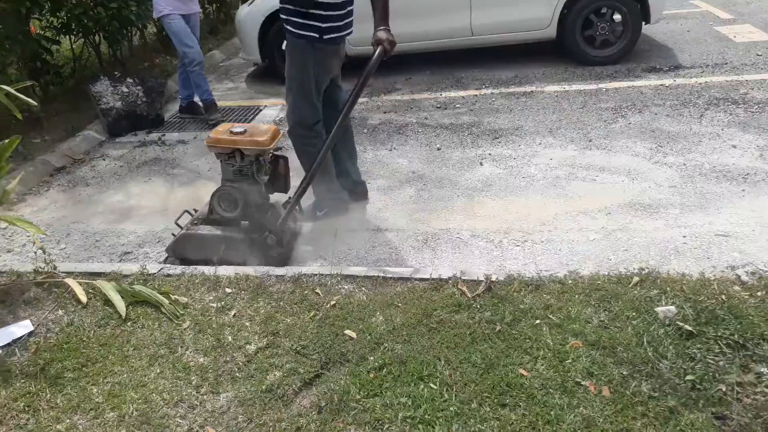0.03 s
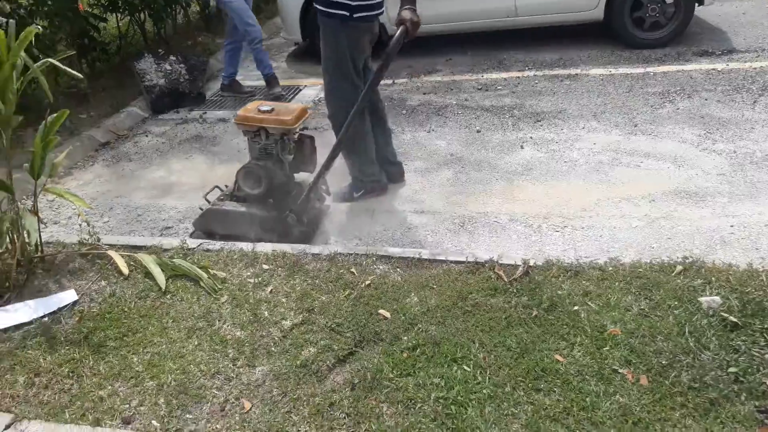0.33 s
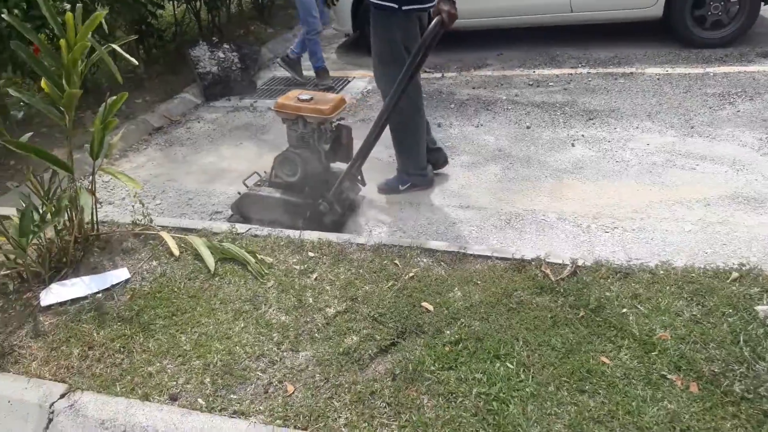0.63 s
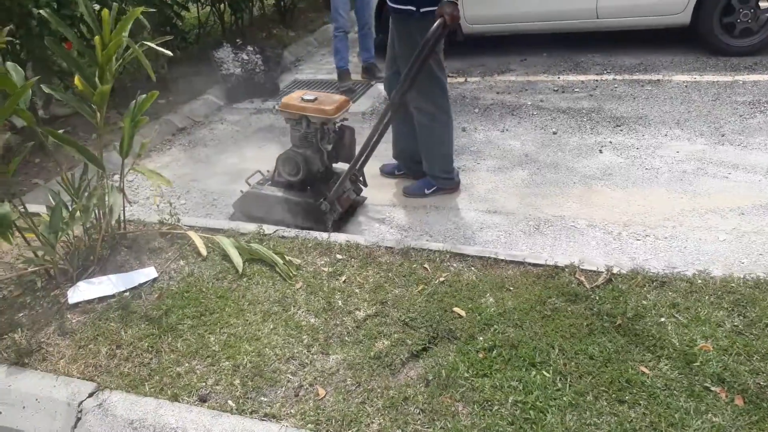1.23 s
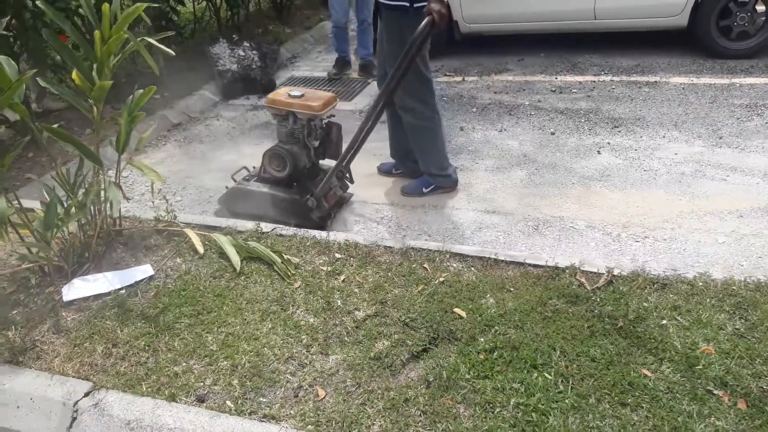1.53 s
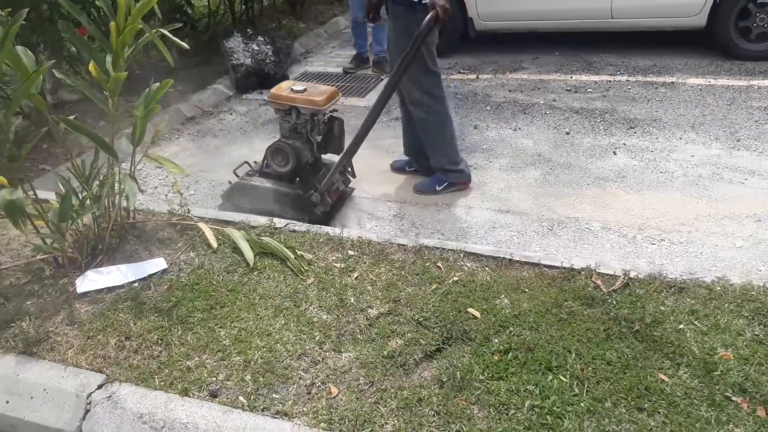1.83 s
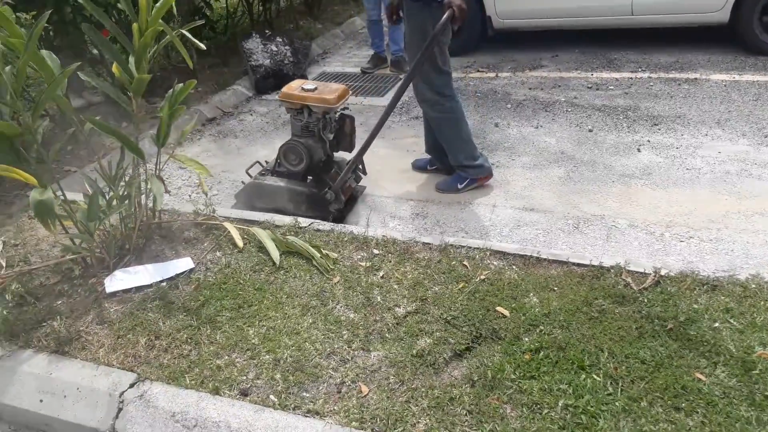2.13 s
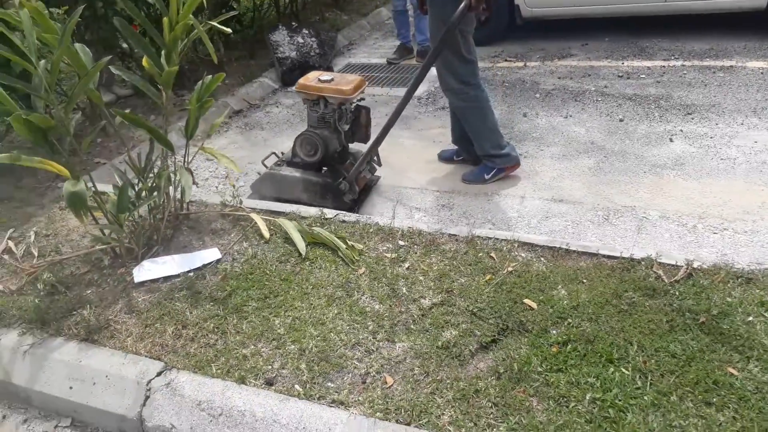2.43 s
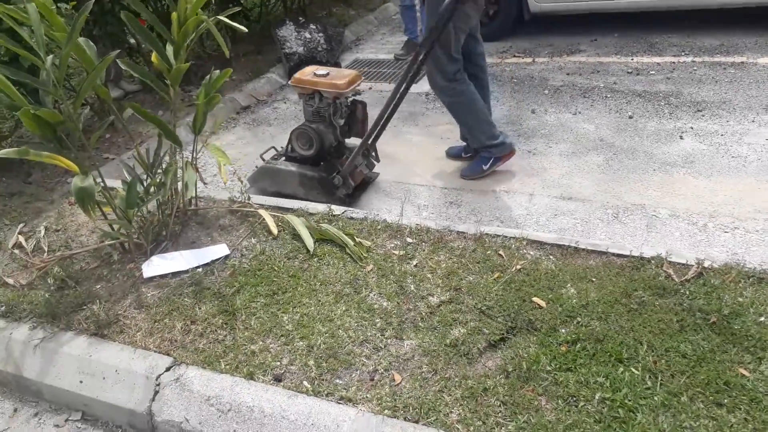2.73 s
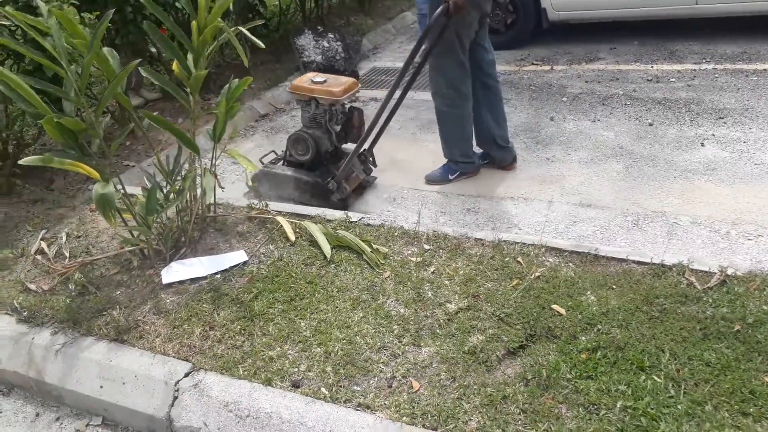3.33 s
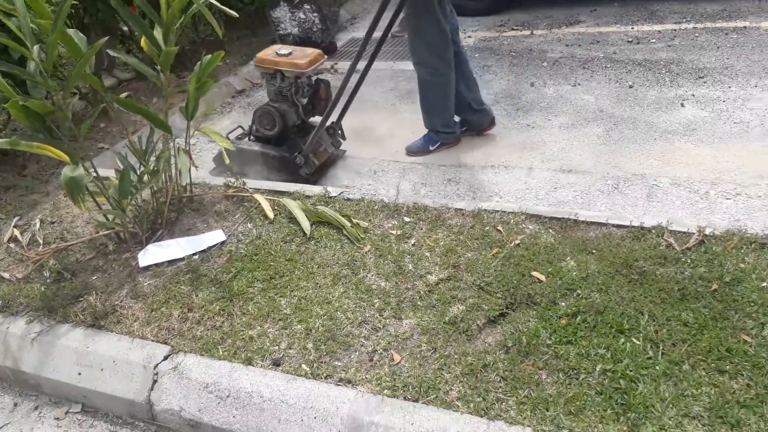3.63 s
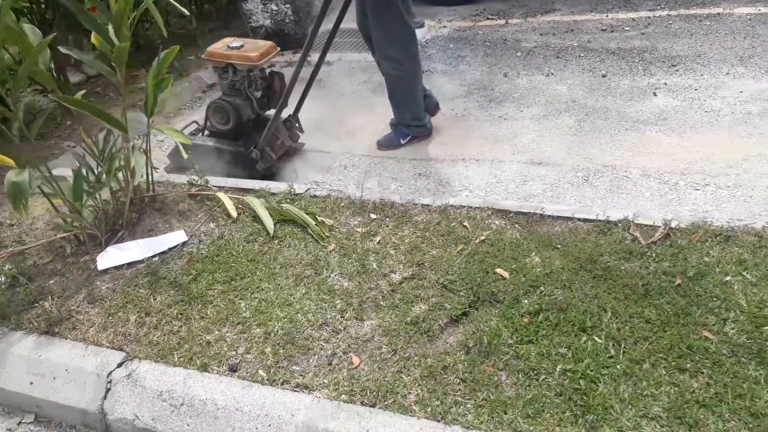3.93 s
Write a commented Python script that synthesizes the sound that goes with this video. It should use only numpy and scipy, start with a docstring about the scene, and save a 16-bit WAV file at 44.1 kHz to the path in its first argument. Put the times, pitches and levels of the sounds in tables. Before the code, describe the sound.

Loud droning, thudding and rattling of a plate compactor vibrating on pavement outdoors.

```python
"""A deep drone cuts in abruptly: a petrol plate compactor at full speed on paving, a few metres away.
An eccentric weight forces the plate to vibrate; every turn it thuds, clanks, rattles and grinds grit.
The one-cylinder four-stroke engine runs slightly out of step with it, adding exhaust throb, a ringing
casing, valve clatter and puffs of gas. In the second half the plate lands hard a few times."""
import sys
import numpy as np
from scipy import signal
from scipy.fft import rfft, irfft
from scipy.io import wavfile
from scipy.ndimage import uniform_filter1d

SR = 44100
rng = np.random.default_rng(int(sys.argv[2]) if len(sys.argv) > 2 else 0)


def digitize_waveform(pressure):
    """Quantize a signal to 16-bit integers and store it at the path in sys.argv[1].

    Rows of a 2-D input are taken as channels; values are limited to [-1, 1].
    """
    field = np.atleast_2d(pressure).T
    bounded = np.clip(field, -1, 1)
    quanta = np.round(bounded * 32767).astype(np.int16)
    wavfile.write(sys.argv[1], SR, quanta)


N = 176400
t = np.arange(N) / SR

# Each row: time in seconds, then relative levels in dB of the plate's hum, thuds, clanks and rattle.
PLATE_LEVELS = [(0.2, -24.5, -25, -24, -20), (0.28, -23, -17.5, -22, -23), (0.41, -28, -20, -23.5, -18.5),
                (0.71, -24.5, -24, -22.5, -19.5), (0.77, -25, -43, -25.5, -20.5),
                (0.84, -27.5, -21.5, -22.5, -18.5), (1.68, -28, -27, -27.5, -20),
                (1.7, -30, -18.5, -24.5, -21.5), (2.12, -27.5, -27.5, -25.5, -22),
                (2.25, -25, -23.5, -24, -23.5), (2.37, -26, -18, -23.5, -21.5),
                (3.72, -21.5, -20.5, -24, -20.5), (3.93, -23.5, -17.5, -27, -20),
                (3.95, -24, -24, -26, -20.5)]
HUM_COLUMN, THUD_COLUMN, CLANK_COLUMN, RATTLE_COLUMN = 1, 2, 3, 4
# Spectra of low thuds and bright rattle. Each row: frequency in Hz, relative density in dB.
THUD_SPECTRUM = [(30, -28.5), (70, -23), (110, -24), (135, 2), (165, -4.5), (205, -4), (260, -5), (330, -2),
                 (400, -8), (470, -11.5), (550, -18), (900, -37.5)]
RATTLE_SPECTRUM = [(1200, -39), (2000, -10), (2800, -13.5), (3220, -4), (3700, -8), (4300, -3), (4750, 3),
                   (5250, 1), (5700, 0), (6400, -3.5), (7100, -8), (8200, -21), (9100, -16), (9500, -26),
                   (10600, -15.5), (12500, -22), (15500, -46)]
# Modes of the loose steel fittings. Each row: frequency in Hz, bandwidth in Hz, gain in dB.
FITTING_MODES = [(3240, 70, 3), (4540, 120, 7), (4730, 120, -1.5), (5050, 17, 2), (5227, 30, 9.5),
                 (5630, 38, -6.5), (6420, 260, -2.5)]


def undb(db):
    """Amplitude grows tenfold for every 20 dB."""
    return 10 ** (np.asarray(db) / 20)


def unit(x):
    """Normalisation to rms 1."""
    return x / np.sqrt(np.mean(x ** 2))


def curve(table, column=1):
    """Linear interpolation of one column over time."""
    rows = np.array(table, float)
    return np.interp(t, rows[:, 0], rows[:, column])


def wander(rate_hz):
    """Low-pass noise: smoothed random steps, rms 1."""
    hold = int(SR / rate_hz)
    steps = np.repeat(rng.standard_normal(1000), hold)[:N]
    return unit(uniform_filter1d(uniform_filter1d(steps, hold), hold))


def colour(x, spectrum):
    """Minimum-phase filtering to a spectrum, falling 24 dB an octave beyond its ends; rms 1."""
    hz, db = np.array(spectrum, float).T
    size = 8192
    f = np.maximum(np.fft.rfftfreq(size, 1 / SR), 1)
    octaves_outside = np.maximum(np.log2(f / hz[-1]), 0) + np.maximum(np.log2(hz[0] / f), 0)
    gain_db = np.interp(np.log(f), np.log(hz), db) - 24 * octaves_outside
    cepstrum = irfft(np.log(undb(gain_db)))
    cepstrum[1:size // 2] *= 2  # folding makes the filter causal
    cepstrum[size // 2 + 1:] = 0
    return unit(signal.fftconvolve(x, irfft(np.exp(rfft(cepstrum))))[:N])


def blows(turns, phase, scatter_db, jitter_s):
    """Quasi-periodic impulse train: one uneven blow a turn, at the fraction of it given by phase."""
    chance = rng.standard_normal((420, 2))
    when = np.interp(np.arange(len(chance)) + phase, turns, t, right=9) + jitter_s * chance[:, 0]
    inside = (when > 0) & (when < t[-1])
    impulses = np.zeros(N)
    np.add.at(impulses, (when[inside] * SR).astype(int), undb(scatter_db * chance[inside, 1]))
    return impulses


def ring(x, decay_s):
    """Convolution with dense metal modes, even in colour: the same dying ring for every blow."""
    age = t[:8192]
    modes = rfft(rng.standard_normal(len(age)) * np.exp(-age / decay_s))
    even = modes / np.sqrt(uniform_filter1d(np.abs(modes) ** 2, size=40))
    return signal.fftconvolve(x, irfft(even)[:len(age) // 2])[:N]


def burst(x, decay_s):
    """Exponential decay: a fresh burst of noise for every blow."""
    return signal.lfilter([1], [1, -np.exp(-1 / (decay_s * SR))], x) * rng.standard_normal(N)


def resonate(x, modes):
    """Modal superposition: resonances driven together; rms 1."""
    return unit(sum(undb(db) * signal.lfilter(*signal.iirpeak(hz, hz / width, SR), x)
                    for hz, width, db in modes))


def tones(turns, harmonics, flutter_db):
    """Harmonics of a rotation, each fluttering in level."""
    return sum(np.sqrt(2) * undb(db + flutter_db * wander(17))
               * np.sin(2 * np.pi * (round(order) * turns + rng.random())) for order, db in harmonics)


def plate_drone(turns):
    """Forced vibration: the weight shakes the plate at its turning rate and, much louder, at twice it."""
    # Each row: time in seconds, relative level of the second harmonic in dB.
    drone_levels = [(0.2, -11), (0.31, -13.5), (0.89, -13.5), (0.92, -12), (1.8, -14.5), (1.88, -20.5),
                    (2.01, -14), (2.23, -15.5), (2.34, -20), (2.62, -13.5), (2.85, -20), (2.93, -13.5),
                    (3.11, -17.5), (3.19, -10), (3.28, -15.5), (3.79, -13.5), (3.84, -19.5), (3.95, -14)]
    # Each row: multiple of the weight's turning rate, level in dB.
    overtones = [(3, -31.5), (4, -42.5), (5, -42)]
    hum = tones(turns, [(1, -0.1)], flutter_db=0.4) * undb(curve(PLATE_LEVELS, HUM_COLUMN))
    drone = tones(turns, [(2, 0.27)], flutter_db=0.65) * undb(curve(drone_levels))
    return hum + drone + tones(turns, overtones, flutter_db=4.5)


def plate_blows(turns):
    """Impact excitation: uneven landings give low thuds, steel clanks and a ringing clang."""
    # Each row: frequency in Hz, relative density in dB.
    clank_spectrum = [(300, -13.5), (480, -11), (600, -4.5), (720, -1), (850, 2.5), (1000, 2), (1200, -1.5),
                      (1400, -3.5), (1600, 2), (1800, -12.5), (2100, -6.5), (2500, -3), (2900, -6.5),
                      (4000, -3.5), (8000, -56.5)]
    # Each row: frequency in Hz, bandwidth in Hz, gain in dB.
    plate_modes = [(1396, 32, 5), (1451, 44, 11.5), (1516, 61, 3), (1563, 25, 3.5), (2443, 94, -1.5)]
    # Each row: time in seconds, relative level in dB.
    clang_levels = [(0.2, -30), (0.22, -28.5), (0.83, -31), (1.32, -23.5), (1.8, -30), (2.87, -22.5),
                    (3.3, -28), (3.34, -21.5), (3.95, -24)]
    landings = blows(turns, .3, scatter_db=2.5, jitter_s=.002)
    thuds = colour(burst(landings, decay_s=0.007), THUD_SPECTRUM)
    strikes = blows(turns, .85, scatter_db=1.5, jitter_s=.0009)
    strikes += 1.34 * blows(turns, .4, scatter_db=1.5, jitter_s=.0009)
    steel = unit(ring(strikes, decay_s=0.018)) + 0.86 * unit(burst(strikes, decay_s=0.014))
    clanks = colour(steel, clank_spectrum)
    clang = resonate(burst(strikes, decay_s=0.0069), plate_modes)
    return (thuds * undb(curve(PLATE_LEVELS, THUD_COLUMN) - 1.14)
            + clanks * undb(curve(PLATE_LEVELS, CLANK_COLUMN) + 1)
            + clang * undb(curve(clang_levels) - 0.5))


def plate_rattle(turns):
    """Contact noise: once a turn loose fittings knock and chink, and grit is crushed under the plate."""
    knocks = blows(turns, .72, scatter_db=3.5, jitter_s=.0005)
    rattle = undb(-5) * colour(ring(knocks, decay_s=0.018), RATTLE_SPECTRUM)
    chink = undb(-8.5) * resonate(burst(knocks, decay_s=0.00093), FITTING_MODES)
    chink = signal.sosfilt(signal.butter(4, [2000, 7000], "band", fs=SR, output="sos"), chink)
    crushes = blows(turns, .6, scatter_db=1.5, jitter_s=.001)
    grit = undb(-4.5) * colour(burst(crushes, decay_s=0.011), RATTLE_SPECTRUM)
    return (rattle + chink + grit) * undb(curve(PLATE_LEVELS, RATTLE_COLUMN))


def engine_casing(cycles):
    """Free vibration: each firing rings the modes of the casing."""
    # Each row: frequency in Hz, bandwidth in Hz, gain in dB.
    casing_modes = [(705.5, 21, -18), (771, 9.3, -1), (795, 42, -26), (952, 12, -14), (1029, 11, 0),
                    (1092, 4.5, 1.5), (1222, 3.9, -9), (1286, 4.1, 5), (1382, 12, 1), (1446, 7.5, -0.5),
                    (1526, 11, 5.5), (1746, 6.5, 3)]
    firings = blows(cycles, .68, scatter_db=2.5, jitter_s=.00003)
    return undb(-31) * resonate(firings, casing_modes)


def valve_clatter(cycles):
    """Damped impacts: valves and piston knock four times a cycle, following the rattle's level."""
    # Each row: moment of a knock as a fraction of the cycle, relative level in dB.
    timing = [(.14, -4), (.23, 0.5), (.46, -7), (0.678, -3.5)]
    # Each row: frequency in Hz, relative density in dB.
    valve_spectrum = [(1200, -17), (2000, -13.5), (3200, -6), (4700, 2.5), (6400, 2), (7200, -16.5),
                      (8200, -20.5), (10600, -15), (12500, -22.5), (15500, -24)]
    knocks = sum(undb(db) * ring(blows(cycles, phase, scatter_db=2.5, jitter_s=.0001), decay_s=.0045)
                 for phase, db in timing)
    return colour(knocks, valve_spectrum) * undb(curve(PLATE_LEVELS, RATTLE_COLUMN) - 3)


def exhaust(cycles):
    """Pulsating flow: a harmonic throb and one hissing puff of gas a cycle."""
    # Each row: multiple of the firing rate, level in dB.
    harmonics = [(2, -46.5), (3, -45), (4, -34), (5, -29), (6, -29.5), (8, -36.5), (9, -32), (11, -35.5),
                 (13, -37.5)]
    # Each row: frequency in Hz, relative density in dB.
    gas_spectrum = [(3000, -29), (7000, -8), (9500, 7), (11000, 10.5), (12500, 7), (14000, 3), (15700, -1)]
    # Each row: time in seconds, level in dB.
    puff_levels = [(0.2, -42.5), (1.2, -43.5), (2, -42), (2.7, -39.5), (4, -38)]
    puffs = blows(cycles, 0.52, scatter_db=1.0, jitter_s=0.00038)
    gas = colour(burst(puffs, decay_s=0.0029), gas_spectrum) * undb(curve(puff_levels))
    return tones(cycles, harmonics, flutter_db=1.4) + gas


def hard_landings():
    """Impulse response: the plate comes down hard, with a low bump and a bright clink of the fittings."""
    # Each row: start in seconds, relative level in dB.
    landings = [(2.577, 1.5), (2.683, -1), (2.717, 0), (2.848, -3), (2.993, -3)]
    hits = np.zeros(N)
    for start_s, db in landings:
        hits[int(start_s * SR)] = undb(db)
    fittings = resonate(ring(hits, decay_s=0.0011), FITTING_MODES)
    clink = colour(fittings + unit(burst(hits, decay_s=0.0037)), RATTLE_SPECTRUM)
    bump = colour(hits, THUD_SPECTRUM)
    return undb(-37) * (clink + bump)


def scene():
    """Superposition of belt-driven shaker and engine, each at its own slightly wavering speed."""
    # Each row: time in seconds, speed of the eccentric weight in turns per second.
    shaker_speed = [(0, 98.42), (3.05, 98.45), (3.3, 98.08), (4, 98.1)]
    firing_hz, sway_cycles, speed_spread = 32.13, .012, .003
    turns = np.cumsum(curve(shaker_speed) * (1 + speed_spread * wander(14))) / SR
    cycles = firing_hz * t + sway_cycles * wander(4)
    plate = plate_drone(turns) + plate_blows(turns) + plate_rattle(turns) + hard_landings()
    engine = engine_casing(cycles) + valve_clatter(cycles) + exhaust(cycles)
    return (plate + engine)[None]


def record(dry):
    """Clipping, gating and low-pass filtering: the sound cuts in abruptly and loses its highest treble."""
    start_s, cutoff_hz = .1425, 15750
    gated = np.clip(dry, -1, 1) * (t >= start_s)
    return signal.sosfilt(signal.ellip(10, .2, 80, cutoff_hz, fs=SR, output="sos"), gated)


dry = scene()
out = record(dry)
digitize_waveform(out)
```